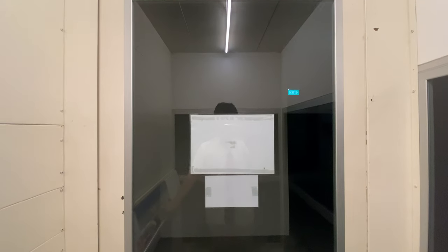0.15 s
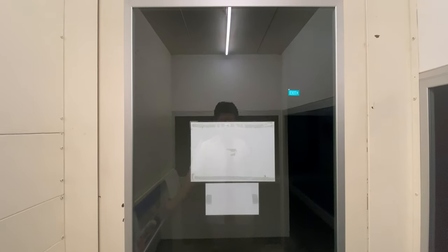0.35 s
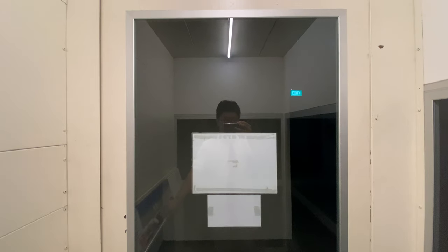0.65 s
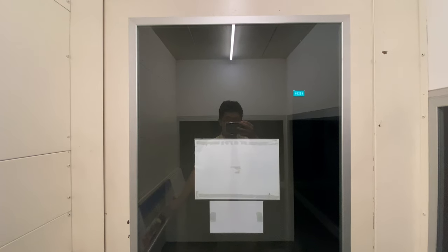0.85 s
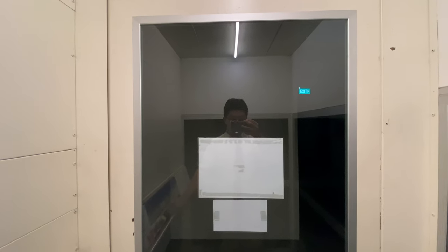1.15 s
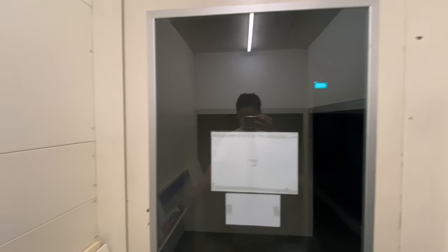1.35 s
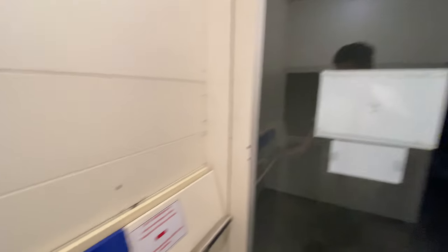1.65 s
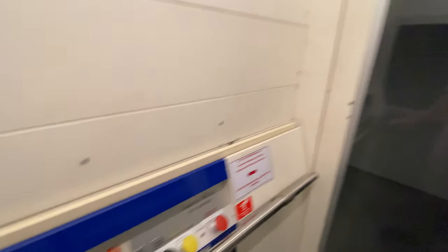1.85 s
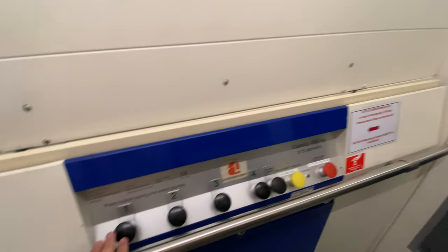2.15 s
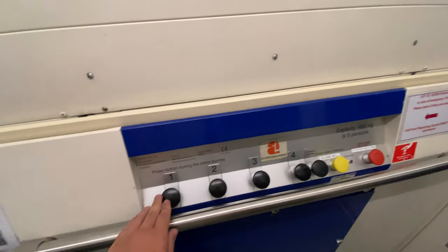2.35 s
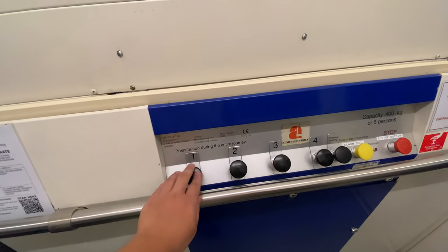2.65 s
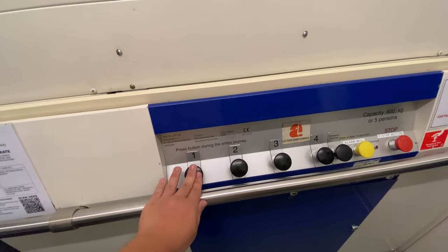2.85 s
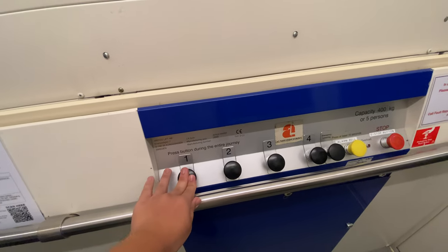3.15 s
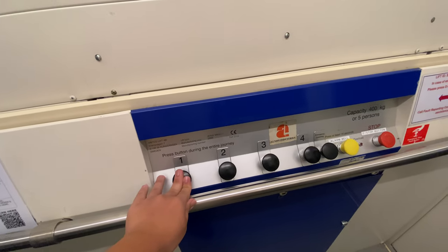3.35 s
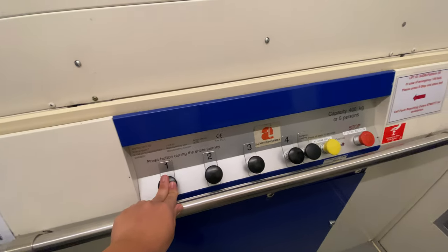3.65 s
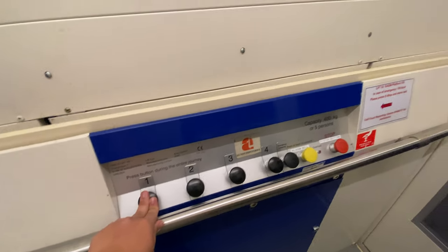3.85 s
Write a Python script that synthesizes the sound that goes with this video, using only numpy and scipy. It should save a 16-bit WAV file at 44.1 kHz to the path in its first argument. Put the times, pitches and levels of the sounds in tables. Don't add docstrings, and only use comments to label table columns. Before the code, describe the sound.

Small lift motor whirs, stops with a clank, latches rattle, then clunks and the motor restarts

```python
import sys
import numpy as np
from scipy import signal
from scipy.fft import rfft, irfft, next_fast_len
from scipy.io import wavfile
from scipy.ndimage import uniform_filter1d, map_coordinates

SR = 44100
rng = np.random.default_rng(int(sys.argv[2]) if len(sys.argv) > 2 else 0)


def volts_from_decibels(level):
    exponent = np.asarray(level, float) / 20
    return 10 ** exponent


def unload_wav(signal):
    wavfile.write(
        sys.argv[1],
        SR,
        np.round(np.clip(np.atleast_2d(signal).T, -1, 1) * 32767).astype(np.int16),
    )


N = 176400
TIME = np.arange(N) / SR

# (frequency [Hz], level [dB per Hz])
CLANK_COLOUR = [(110, -26), (200, -5.5), (950, -4), (1800, -10), (3400, -19), (6200, -21), (10500, -35),
                (14500, -42)]


def unit(x):
    return x / np.sqrt(np.mean(x ** 2) + 1e-20)


def along(points, hz):
    f, v = np.transpose(points)
    return np.interp(np.log(hz + 1), np.log(f + 1), v)


def curves(rows, t):
    s, *cols = np.transpose(rows)
    return [np.interp(t, s, c) for c in cols]


def wobble(rate, size=N):
    knots = rng.standard_normal(int(size * rate / SR) + 4)
    return map_coordinates(knots, [np.arange(size) * rate / SR])


def filtered(x, response):
    m = next_fast_len(x.shape[-1] + 8192)
    return irfft(rfft(x, m) * response(np.fft.rfftfreq(m, 1 / SR)), m)[..., :x.shape[-1]]


def resonances(rows, f):
    power = sum(volts_from_decibels(2 * db) * (f * w) ** 2 / ((c * c - f * f) ** 2 + (f * w) ** 2) for c, w, db in rows)
    return np.sqrt(power)


def noise(response, size=N):
    return unit(filtered(rng.standard_normal((2, size)), response))


def add(out, s, x):
    part = out[:, round(s * SR):][:, :x.shape[-1]]
    part += x[..., :part.shape[1]]


def cabin():
    # (time [s], level [dB])
    boom_level = [(0, -36), (1, -37.5), (1.5, -40.5), (2, -39), (2.4, -45.5), (2.7, -46), (3.1, -44),
                  (3.5, -38), (4, -35.5)]
    # (frequency [Hz], level [dB per Hz])
    boom_colour = [(20, -18), (35, -14), (50, 3), (68, -3.5), (90, -6), (115, -19), (130, -42)]
    # (frequency [Hz], level [dB per Hz])
    air_colour = [(100, -18), (230, -27), (420, -26.5), (1200, -48), (3000, -55), (14500, -78)]
    drone_mode = [(161.1, 24, 0)]  # (Hz, width Hz, dB)
    boom_db, = curves(boom_level, TIME)
    boom = volts_from_decibels(boom_db) * noise(lambda f: volts_from_decibels(along(boom_colour + [(150, -120)], f)))
    drone = volts_from_decibels(-59.5 + 3.8 * wobble(2.9)) * noise(lambda f: resonances(drone_mode, f) ** 2)
    air = volts_from_decibels(-53 + wobble(1.77)) * noise(lambda f: volts_from_decibels(along(air_colour, f)))
    return boom + drone + air


def stairwell(x):
    level_db, t60_s, dull_hz = -26.5, 2, 1200
    size = SR * 3 // 2
    tail = noise(lambda f: f / (f + 200) / (1 + (f / dull_hz) ** 2), size=size)
    tail = tail * volts_from_decibels(-60 * TIME[:size] / t60_s)
    return volts_from_decibels(level_db) * signal.fftconvolve(x, tail / np.linalg.norm(tail[0]), axes=1)[:, :N]


def thumps():
    # (time [s], frequency [Hz], level [dB], hold [s], T60 [s])
    panel_hits = [(1.695, 83.5, -29, 0.025, 0.14), (1.72, 231, -35, 0.049, 0.14),
                  (1.905, 202, -37, 0.023, 0.12), (2.97, 479, -55, 0.11, 0.28),
                  (1.72, 410, -40, 0.05, 0.22), (1.725, 327, -43, .04, .2), (3.212, 76, -30.5, 0.025, 0.12),
                  (3.215, 115, -31.5, 0.03, 0.63), (3.215, 146, -26, 0.05, 0.5), (3.01, 260, -50, .05, .2),
                  (1.745, 130, -36, .03, .15), (1.6, 180, -45, .05, .2), (3.4, 164, -28.5, 0.038, 0.077),
                  (3.408, 226.6, -34, 0.032, 0.24)]
    out, t = np.zeros((2, N)), TIME[:SR // 2]
    for s, hz, db, hold, t60 in panel_hits:
        level_db = db - 60 * np.maximum(t - hold, 0) / t60 + 1.5 * wobble(58.3, size=len(t))
        swell = 1 - np.exp(-t * hz / 0.5)
        drift = .4 * wobble(.08 * hz, size=len(t))
        tone = np.sin(2 * np.pi * hz * t + np.array([[0], [1.3]]) + drift)
        add(out, s, volts_from_decibels(level_db) * swell * tone)
    return out


def windings():
    # (time [s], hum level [dB], growl level [dB])
    motor_load = [(3.4, -70, -61), (3.52, -39, -52), (3.64, -41, -46.5), (3.74, -28.5, -36),
                  (3.82, -32.5, -38), (3.93, -38.5, -32), (4, -42, -33)]
    # (frequency [Hz], width [Hz], level [dB])
    frame_modes = [(205, 30, -3), (380, 40, 0), (560, 60, -8), (700, 40, -12)]
    hum_hz = 146
    hum_db, growl_db = curves(motor_load, TIME)
    phase = 2 * np.pi * hum_hz * TIME + 1.2 * wobble(22) + np.array([[0], [1.3]])
    hum = np.sqrt(2) * np.sin(phase) * volts_from_decibels(3 * wobble(40))
    growl = noise(lambda f: resonances(frame_modes, f) ** 2)
    return (volts_from_decibels(hum_db) * hum + volts_from_decibels(growl_db) * growl) * (TIME > motor_load[0][0])


def relay():
    # (frequency [Hz], level [dB])
    box_tones = [(242, -9), (470, -5.5), (554, 0.5), (640, -11), (1090, -12), (1340, -16), (1790, -18),
                 (2200, -21)]
    start_s, level_db, hold_s, t60_s = 3.091, -33.5, 0.053, .1
    chatter_hz, chatter_depth = 99.5, 0.57
    out, t = np.zeros((2, N)), TIME[:SR // 4]
    box = np.zeros((2, len(t)))
    for hz, db in box_tones:
        drift = .7 * wobble(0.067 * hz, size=len(t)) + rng.uniform(0, 5.9, (2, 1))
        box += volts_from_decibels(db) * np.sin(2 * np.pi * hz * t + drift)
    chatter = 1 + chatter_depth * np.cos(2 * np.pi * chatter_hz * t)
    fade = volts_from_decibels(level_db - 60 * np.maximum(t - hold_s, 0) / t60_s)
    add(out, start_s, box * chatter * fade * (1 - np.exp(-t / 0.0018)))
    return out


def ticks():
    # (time [s], peak level [dB])
    contacts = [(0.9075, -26.5), (0.9203, -24.5), (1.3417, -50), (1.3838, -37), (1.3962, -33.5),
                (1.5409, -48), (1.5818, -40), (1.7132, -27), (1.8697, -38), (2.9304, -70), (2.9687, -44),
                (3.0086, -41), (3.1388, -41), (3.2067, -22.5), (3.3059, -39), (3.378, -30), (3.393, -25.5),
                (3.471, -22), (3.487, -24)]
    trim_db, t60_s, low_cut_hz = -8.5, 0.046, 1500
    out, t = np.zeros((2, N)), TIME[:SR // 10]
    for s, db in contacts:
        crack = noise(lambda f: volts_from_decibels(along(CLANK_COLOUR, f)) * f * f / (f * f + low_cut_hz ** 2), size=len(t))
        add(out, s - .001, crack * volts_from_decibels(db + trim_db - 60 * t / t60_s) * (1 - np.exp(-t / .0004)))
    return out


def clanks(blows, steel, ring_db):
    # (frequency [Hz], T60 [s])
    shaft_echo = [(200, 1), (800, 0.59), (3000, 0.56), (10000, 0.41)]
    late_db, late_t60_s = -27, 1.2
    steel_rough = .0011
    out, size = np.zeros((2, N)), SR * 4 // 5
    t = TIME[:size]
    for s, db, tilt_db, rise, hold in blows:
        colour = lambda f: volts_from_decibels(along(CLANK_COLOUR, f) + tilt_db * np.log2(np.maximum(f, 300) / 1500))
        hz, at, z = signal.stft(noise(colour, size=size), SR, nperseg=192)
        grain = uniform_filter1d(rng.standard_normal(z.shape[1:]), size=14, axis=1)
        z = z * volts_from_decibels(4.0 * unit(grain))
        late = np.maximum(at - hold, 0)
        echo = volts_from_decibels(-60 * late / along(shaft_echo, hz)[:, None]) + volts_from_decibels(late_db - 60 * late / late_t60_s)
        tail = signal.istft(z * echo, SR, nperseg=192)[1][:, :size]
        tail *= volts_from_decibels(0.95 * wobble(65.4, size=size) * np.exp(-t / 0.037))
        for f, level, t60 in steel:
            level_db = level + ring_db + tilt_db * np.log2(f / 1500) + rng.normal(0, 2, (2, 1))
            drift = np.cumsum(rng.standard_normal((2, size)), axis=1) * steel_rough * np.sqrt(f)
            phase = 2 * np.pi * f * t + drift + rng.uniform(0, 4.7, (2, 1))
            tail += volts_from_decibels(level_db - 60 * np.maximum(t - hold, 0) / t60) * np.sin(phase)
        add(out, s, volts_from_decibels(db) * tail * (1 - np.exp(-t / max(rise, 1e-4))))
    return out


def brake_and_latches():
    # (time [s], level [dB], tilt [dB per octave], rise [s], hold [s])
    brake_stop = [
        (.907, -30.5, 2, 0.0073, 0.0092),
    ]
    latch_rattle = [
        (1.334, -58, 2.5, 0.0037, 0.059),
        (1.394, -39, -1, 0.0016, 0.025),
        (1.57, -43.5, 1, 0.007, .03),
        (1.63, -42, -1, 0.022, 0.084),
        (1.708, -34, 1, 0.0065, 0.049),
        (1.84, -37.5, -1, 0.0091, 0.016),
        (1.905, -38, 0, 0.0096, 0.013),
        (2.03, -53, 1, 0.012, 0.012),
    ]
    brake_lift = [
        (2.968, -52, 1.5, 0.00047, 0.07),
        (3.05, -55, 3.5, 0.0095, .03),
        (3.09, -43, -3, 0.0045, 0.11),
        (3.155, -45.5, 0.5, 0.0068, 0.037),
        (3.197, -28.5, 0, 0.0096, 0.014),
        (3.363, -38, 1.5, 0.0048, 0.027),
        (3.388, -29, 1, 0.0095, 0.032),
        (3.462, -37.5, 4.5, 0.003, 0.0043),
    ]
    last_knock = [
        (3.485, -31, -1, 0.003, 0.014),
    ]
    # (frequency [Hz], level [dB], T60 [s])
    stop_steel = [(613, -1, 0.63), (1518, -4, 0.3), (1810, -6.5, 0.36), (2260, -8, 0.29), (4059, -16, 0.25)]
    latch_steel = [(302, -3.5, 0.77), (908, -1, 0.82), (1290, -5, 0.36), (2000, -7.5, 0.4),
                   (2475, -8, 0.27), (3740, -21, .15)]
    lift_steel = [(1163, -8, .3), (1513, 0, .35), (1841, 0, .35), (2159, -3, .15), (6100, -6, .25)]
    knock_steel = [(1163, -9, .3), (1513, 0, .3), (1841, 1, .25), (2159, -9, .15), (2400, -10, .15),
                   (6000, -11, .15), (6300, -11, .15)]
    hits = clanks(brake_stop, stop_steel, ring_db=4.5)
    hits += clanks(latch_rattle, latch_steel, ring_db=-7)
    hits += clanks(brake_lift, lift_steel, ring_db=-11)
    hits += clanks(last_knock, knock_steel, ring_db=1)
    return hits


def drive():
    # (time [s], level [dB], brightness [dB per octave])
    runs = [
        [(0, -26, -0.5), (.6, -26, -0.5), (.75, -25.5, -4.5), (.9, -24, -10), (.99, -27, -12), (1.12, -38, -11),
         (1.3, -80, -10)],
        [(3.45, -45, -10), (3.6, -37, -11.5), (3.72, -36, -8.5), (3.82, -26.5, -6.5), (3.92, -22, -2.5),
         (4, -27, 0)],
    ]
    # (time [s], share of full speed [1])
    speed_curve = [(.6, 1), (1, .9), (3.5, .8), (3.93, .97), (4, 1)]
    # (frequency [Hz], width [Hz], level [dB])
    casing = [(295, 136, 1.5), (527, 53, 1.5), (826, 350, -5), (1017, 48, -3.5), (1284, 180, -6),
              (1830, 230, -12), (2116, 95, -9.5), (2380, 660, -5.5), (3290, 330, -9), (5760, 990, -13),
              (8950, 2200, -29)]
    strong_orders = [13, 14, 15, 16, 18, 20, 24, 25, 28, 32, 37, 38, 39, 40, 41, 48, 57, 61, 63, 64, 73, 82,
                     86, 97, 111]
    # (middle [dB], side [dB])
    strong_levels = [(-6.5, 5), (8, -3), (4.5, 4), (6.5, -8), (6, -14), (0.5, 2), (5, 11), (6, 8), (5, 5),
                     (4.5, 3), (1.5, 3), (6, -6), (11, 12), (-0.5, 0), (5, -1), (5, 0), (8.5, 5), (1.5, 1),
                     (5, 5), (7, 9), (2, -2), (5, 8), (0.5, 5), (3, 6), (1, 2)]
    shaft_hz = 21.31
    strong_db, comb_db, grind_db, scatter_db = -16, -4, -5.5, 3
    flutter_db, wander_rad, flutter_per_s = 4, .72, 24
    smear_db, smear_grind = 170, 1.38
    sink = .35
    out, order = np.zeros((2, N)), np.arange(10, 130)

    def colour(f):
        return resonances(casing, f) * f ** 4 / (f ** 4 + 216.0 ** 4) / (1 + (f / 9500) ** 3)

    comb = colour(order * shaft_hz) * volts_from_decibels(scatter_db * rng.standard_normal((2, len(order))))
    comb *= volts_from_decibels(comb_db) / np.sqrt(np.mean(np.sum(comb ** 2, 1)) / 2)
    for k, (mid_db, side_db) in zip(strong_orders, strong_levels):
        comb[:, k - order[0]] = volts_from_decibels(strong_db + np.array([mid_db, side_db]))

    for run in runs:
        t = TIME[round(run[0][0] * SR):round(run[-1][0] * SR)]
        speed, = curves(speed_curve, t)
        level_db, tilt_db = curves(run, t)
        turn = 2 * np.pi * np.cumsum(shaft_hz * speed) / SR

        knots = rng.standard_normal((2 * len(order), int(flutter_per_s * len(t) / SR)))
        knot_s = np.linspace(t[0], t[-1], knots.shape[1])
        slow = np.array([np.interp(t[::64], knot_s, k) for k in knots])
        octaves = np.log2(np.clip(order / 42, 1, 3.5))[:, None]
        size = volts_from_decibels(flutter_db * slow[::2] + tilt_db[::64] * octaves)
        size = np.repeat(size, 64, axis=1)[:, :len(t)]
        wander = np.repeat(wander_rad * slow[1::2], 64, axis=1)[:, :len(t)]
        angle = (np.outer(order, turn) + wander).astype(np.float32)
        phase = rng.uniform(0, 2 * np.pi, (2, len(order)))
        lines = (comb * np.cos(phase)) @ (size * np.sin(angle))
        lines = lines + (comb * np.sin(phase)) @ (size * np.cos(angle))

        hz, at, z = signal.stft(noise(colour, size=len(t)), SR, nperseg=256)
        octaves = np.log2(np.clip(hz / 900, 1, 3.5)) + sink * np.log2(np.clip(hz / 350, 1, 2.6))
        tilt = volts_from_decibels(np.outer(octaves, np.interp(at, t - t[0], tilt_db)))
        grind = signal.istft(z * tilt, SR, nperseg=256)[1][:, :len(t)]
        grind = grind * volts_from_decibels(grind_db + 1.24 * wobble(40.1, size=len(t)))

        keep = volts_from_decibels(-smear_db * (1 - speed))
        smeared = np.sqrt(1 + smear_grind * (1 - keep ** 2)) * grind
        add(out, t[0], volts_from_decibels(level_db) * (keep * lines + smeared))
    return out


def scene():
    # (frequency [Hz], side over middle [dB])
    width = [(30, -24), (60, -15.5), (150, -7.5), (500, -3.5), (2400, 1.5), (6000, -1.5)]
    lean = 0.11
    lift = drive() + brake_and_latches() + ticks() + relay()
    mid, side = lift + stairwell(lift) + thumps() + windings() + cabin()
    side = filtered(side, lambda f: volts_from_decibels(along(width, f))) + lean * mid
    return np.array([mid + side, mid - side])


def top_cut(x):
    return signal.sosfilt(signal.butter(12, 15700, fs=SR, output="sos"), x)


def record(dry):
    gap_hz, gap_width_hz, gap_db, top_hz = 12100, 520, -45, 15200

    def response(f):
        return volts_from_decibels(gap_db * np.exp(-((f - gap_hz) / gap_width_hz) ** 4)) * (f < top_hz)

    mix = filtered(dry, response)
    return top_cut(mix)


dry = scene()
out = record(dry)
unload_wav(out)
```